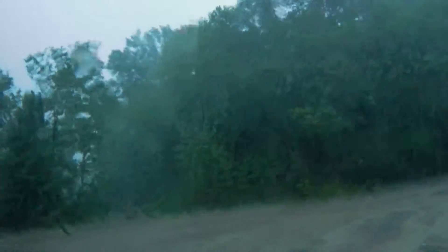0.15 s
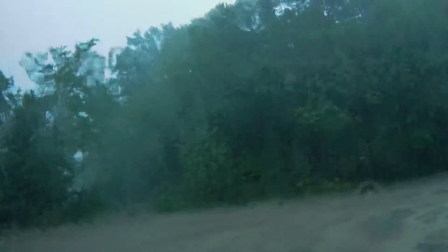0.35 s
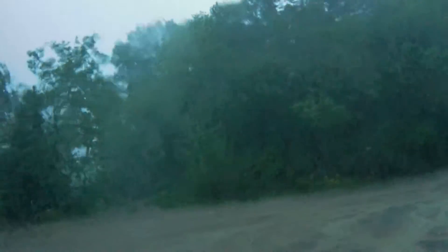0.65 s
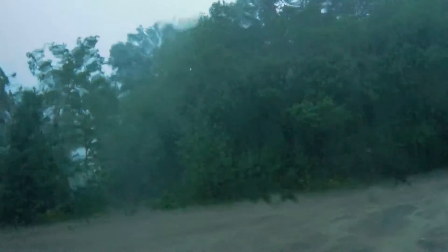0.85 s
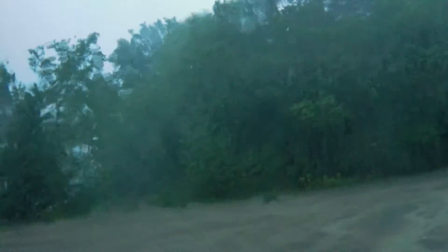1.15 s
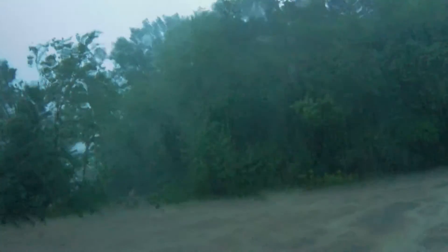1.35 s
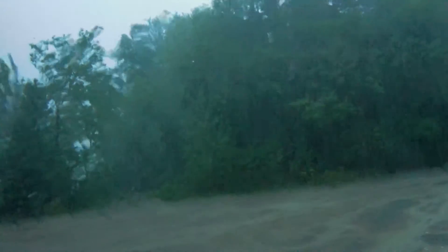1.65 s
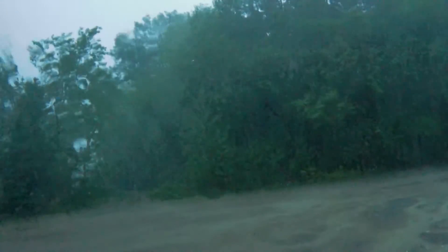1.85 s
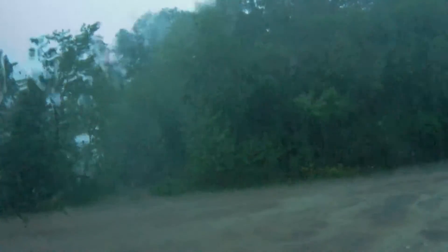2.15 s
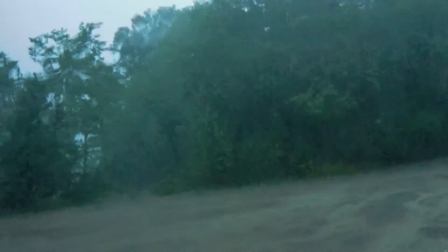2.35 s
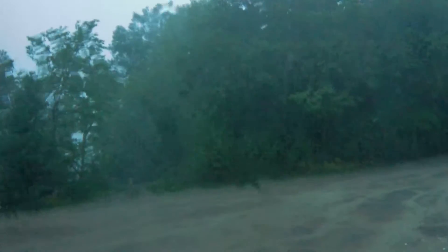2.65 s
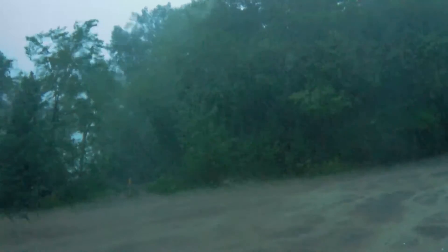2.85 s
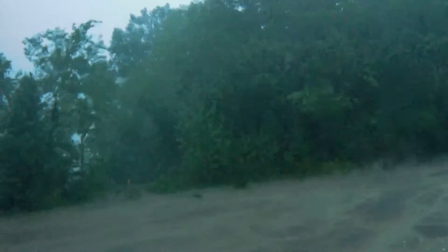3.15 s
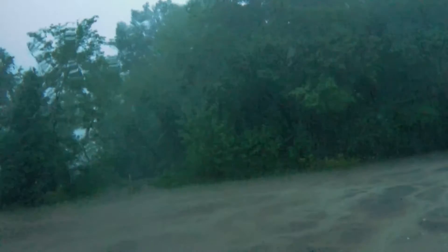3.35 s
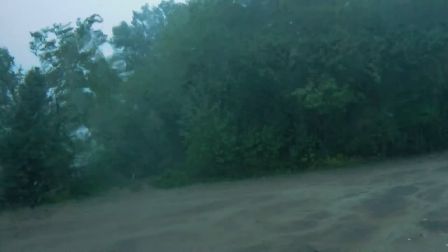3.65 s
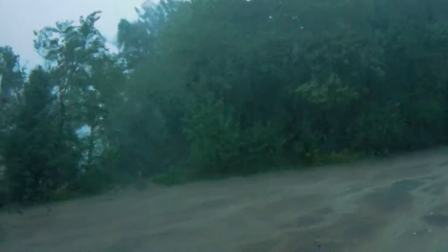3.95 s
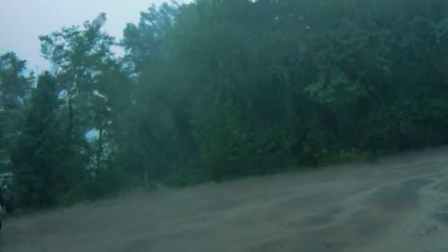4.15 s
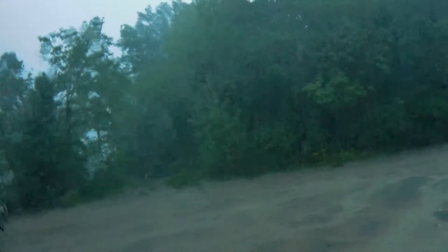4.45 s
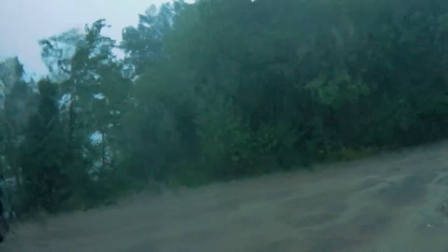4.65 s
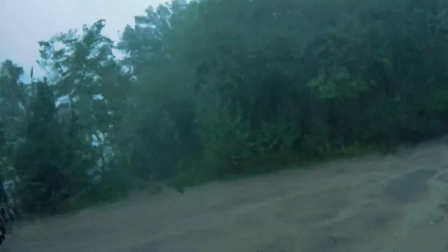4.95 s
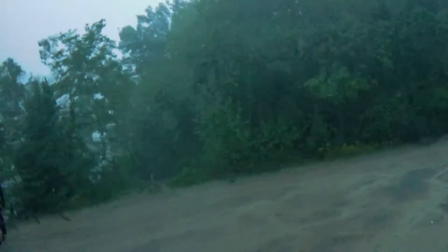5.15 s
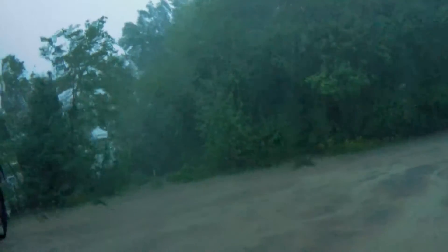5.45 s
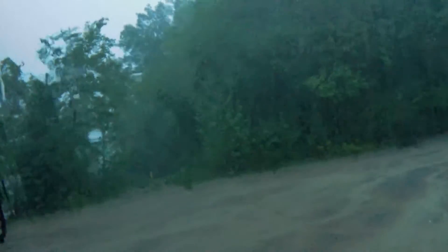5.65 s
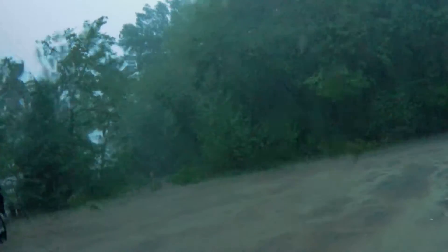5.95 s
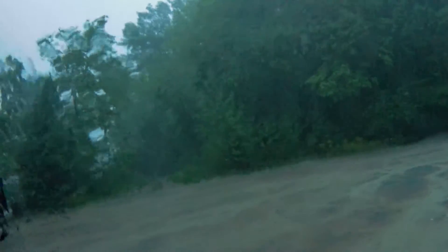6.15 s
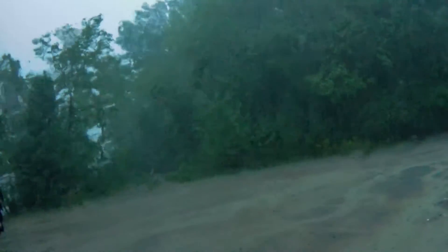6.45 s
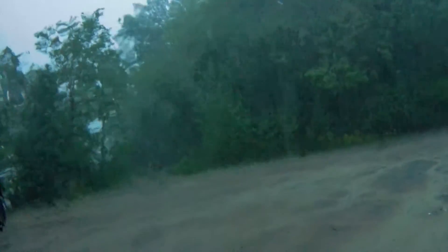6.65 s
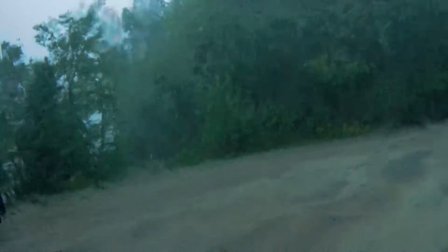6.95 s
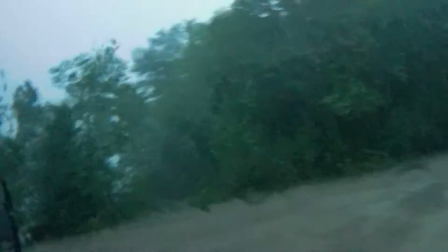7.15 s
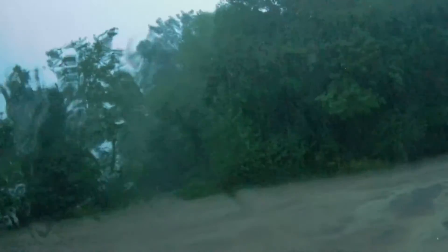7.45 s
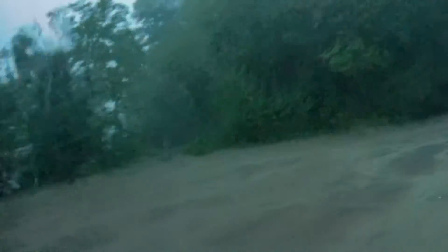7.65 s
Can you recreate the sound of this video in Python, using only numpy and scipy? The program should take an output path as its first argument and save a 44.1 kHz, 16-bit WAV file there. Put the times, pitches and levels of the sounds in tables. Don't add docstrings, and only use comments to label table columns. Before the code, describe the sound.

Inside a truck cab, a dense rushing downpour pounds sheet metal, thins midway and swells again, over a faint deep idle and scattered window ticks.

```python
import sys
import numpy as np
from scipy import signal
from scipy.fft import rfft, irfft, next_fast_len
from scipy.io import wavfile
from scipy.ndimage import uniform_filter1d

SR = 44100
rng = np.random.default_rng(int(sys.argv[2]) if len(sys.argv) > 2 else 0)


def gain_from_db(level_db):
    decades = np.asarray(level_db, float) / 20
    return 10 ** decades


def put_to_file(sound):
    columns = np.atleast_2d(sound).T
    safe = np.clip(columns, -1, 1)
    whole_steps = np.round(safe * 32767)
    wavfile.write(sys.argv[1], SR, whole_steps.astype(np.int16))


N = 343980


def unit_rms(x):
    return x / np.sqrt(np.mean(x ** 2) + 1e-20)


def curve(points):
    time_s, value = np.transpose(points)
    return np.interp(np.arange(N) / SR, time_s, value)


def bells(center_s, heights, half_s):
    t = np.arange(N)[:, None] / SR
    return np.exp(-((t - center_s) / half_s) ** 2) @ heights


def at_hz(points, hz):
    table_hz, value = np.transpose(points)
    return np.interp(np.log(hz + 1), np.log(table_hz), value)


def coloured(spectrum, points):
    hz = np.arange(len(spectrum)) * SR / (2 * len(spectrum) - 2)
    return unit_rms(irfft(spectrum * gain_from_db(at_hz(points, hz)))[:N])


def drift(rate_hz):
    hop = 40
    r = np.exp(-2 * np.pi * rate_hz * hop / SR)
    noise = rng.standard_normal(N // hop + 2002)
    slow = signal.lfilter([1], [1, -2 * r, r * r], noise)[2000:]
    return np.interp(np.arange(N) / hop, np.arange(len(slow)), unit_rms(slow))


# freq_hz, density_db_per_hz
ROOF_COLOUR = [(53, -38), (90, -4.5), (150, 0), (270, -5), (420, -2), (700, -3.5), (1150, -8), (1600, -6.5),
               (1780, -11.5), (1950, -15.5), (2300, -21.5), (2800, -35.5), (3200, -44), (4200, -49.5)]
# freq_hz, density_db_per_hz
GLASS_COLOUR = [(1700, -13.5), (2600, -2.5), (3150, -8), (3700, 0), (4400, -4.5), (5700, -4.5), (7000, -12),
                (8600, -21.5), (9700, -20), (10800, -14), (12000, -23), (14000, -37), (15600, -36)]
# center_hz, width_hz, boost_db
PANEL_MODES = [(218, 56, 5), (339.6, 56, 6), (422, 103, 6), (617.4, 57, 6), (880, 136, 4.5),
               (1302, 1080, 7.5)]


def rain():
    drops_per_s, size_spread_db = 2500.0, 1
    roof_db, glass_db, boom_db = storm()
    clumps_db = 0.5 * drift(21.0) + 0.46 * drift(44.0)

    gust = gain_from_db(roof_db - roof_db.mean()) ** 0.6
    landed = rng.random(N) < drops_per_s * gust / SR
    size_db = size_spread_db * np.minimum(rng.exponential(1, N), 6)
    drops = landed * gain_from_db(size_db) * rng.choice([-1, 1], N)
    local_power = uniform_filter1d(drops ** 2, size=SR // 10)
    drops = drops / np.sqrt(local_power + 1e-9) * gain_from_db(clumps_db)

    spots = spot_responses(count=8)
    fft_size = 2 * next_fast_len(N // 2 + SR // 4)
    spot_of = rng.integers(0, len(spots), N)
    answers = rfft(spots, fft_size)
    answers = answers / np.sqrt(np.mean(abs(answers) ** 2, axis=0) + 1e-12)
    struck = sum(rfft(drops * (spot_of == k), fft_size) * h for k, h in enumerate(answers))

    hz = np.arange(len(struck)) * SR / fft_size
    boost_db = sum(db / (1 + ((hz - center_hz) / (width_hz / 2)) ** 2)
                   for center_hz, width_hz, db in PANEL_MODES)
    roof = gain_from_db(roof_db + 0.66) * coloured(struck * gain_from_db(boost_db), ROOF_COLOUR)
    boom = signal.sosfilt(signal.butter(1, 700.0, fs=SR, output="sos"), roof)
    roof = roof + (gain_from_db(boom_db) - 1) * boom

    glass = gain_from_db(glass_db + 0.54) * coloured(struck, GLASS_COLOUR)
    mist = signal.sosfilt(signal.butter(2, 6500.0, "high", fs=SR, output="sos"), glass)
    mist_db = 0.2 * (glass_db - glass_db.mean()) + 1.0 * drift(11.0)
    return roof + glass + (gain_from_db(mist_db) - 1) * mist


# time_s, level_db
DOWNPOUR_LEVEL = [(0, -37), (.26, -38), (.38, -33.5), (.76, -36), (.84, -38.5), (1.3, -41), (1.5, -39),
                  (2.26, -40), (2.34, -44), (3.0, -44), (3.42, -49), (4.08, -49), (4.45, -40),
                  (4.98, -46.5), (5.16, -42.5), (6.2, -43), (7.3, -38), (7.8, -37.5)]
# center_s, change_db, half_s
SHEETS_AND_LULLS = [(0.174, -5, .05), (1.84, -2.5, .09), (2.89, 3.5, 0.088), (3.54, -5, 0.033),
                    (3.808, 3, 0.019), (3.99, -1.5, 0.018), (4.254, 2, .07), (5.351, 1.5, .05),
                    (6.406, 3, .05), (6.5, -0.5, 0.024), (6.603, 3, 0.093), (7.8, -4, .02)]
# time_s, level_db
WIND_SLANT = [(0, -19.5), (.27, -17.5), (.5, -19.5), (1.6, -21.5), (2.6, -23), (3.6, -24), (4.1, -20.5),
              (4.5, -25.5), (5.0, -21), (5.3, -22), (6.3, -19), (6.8, -21), (7.55, -21), (7.8, -22.5)]


def storm():
    roof_db = curve(DOWNPOUR_LEVEL) + bells(*np.transpose(SHEETS_AND_LULLS))
    slant_db = curve(WIND_SLANT)
    boom_db = -0.07 - 0.1 * (roof_db - roof_db.mean()) - 0.23 * (slant_db - slant_db.mean())
    return roof_db, roof_db + slant_db, boom_db


# freq_hz, t60_s
BODY_DECAY = [(100, 0.19), (500, 0.085), (1500, 0.071), (4000, 0.015), (12000, 0.0052)]


def spot_responses(count):
    t = np.arange(SR // 4) / SR
    white = rng.standard_normal((2, count, len(t)))
    out = 0
    for k, low_hz in enumerate(40 * 2.0 ** np.arange(9)):
        t60_s = at_hz(BODY_DECAY, low_hz * np.sqrt(2))
        high_hz = min(2 * low_hz, 0.49 * SR)
        band = signal.butter(2, [low_hz, high_hz], "band", fs=SR, output="sos")
        decay = gain_from_db(-60 * t / t60_s) / np.sqrt(t60_s)
        out = out + signal.sosfilt(band, white[k % 2] * decay)
    return out


# start_s, thud_db, splash_db, splash_hz
BIG_DROPS = [(0.0298, -36, -53, 8500), (0.2164, -40, -69, 10800), (0.2568, -30, -51, 11000),
             (0.5661, -36, -66, 8100), (0.6479, -35, -61, 10100), (0.7966, -37, -60, 10700),
             (0.8474, -49, -64.5, 10100), (0.9524, -41, -64, 7500), (0.9654, -44, -58, 10900),
             (1.0735, -31, -54, 10600), (1.1144, -46, -68, 10600), (1.3733, -43, -74, 9800),
             (1.8562, -44, -68, 10900), (2.8225, -47, -61, 9500), (2.8624, -57, -62, 12000),
             (3.2256, -50, -71, 10800), (3.4371, -51, -72, 8400), (3.7988, -51, -76, 7500),
             (4.2203, -42, -71, 10700), (4.3784, -50, -60, 10300), (4.6074, -50, -65, 10900),
             (4.8559, -45, -59, 8000), (4.9404, -52, -61, 11200), (5.0634, -48, -65, 11000),
             (5.4864, -44, -70, 7700), (6.8758, -42, -71, 11100), (6.9361, -40, -64, 10700),
             (7.0025, -42, -56, 11400), (7.1894, -50, -61, 10700), (7.2894, -53, -64, 10800)]
# freq_hz, level_db, t60_s
TICK_MODES = [(1470, 5, 0.017), (2300, 2, .012), (3710, -0.5, 0.018), (4660, -2, 0.012), (5420, 0.5, 0.017),
              (6550, -3.5, 0.012)]


def ticks():
    splash_t60_s, delay_s = 0.015, 0.00053
    t = np.arange(1000) / SR
    out = np.zeros(N + len(t))
    for start_s, thud_db, splash_db, splash_hz in BIG_DROPS:
        thud = 0
        for k, (hz, db, t60_s) in enumerate(TICK_MODES):
            ring_db = db + rng.normal(0, 1.5) - 60 * t / t60_s
            thud = thud + (-1) ** k * gain_from_db(ring_db) * np.sin(2 * np.pi * hz * t)
        burst = rng.standard_normal(len(t)) * gain_from_db(-60 * t / splash_t60_s)
        band = signal.butter(2, [0.81 * splash_hz, 1.12 * splash_hz], "band", fs=SR, output="sos")
        splash = signal.sosfilt(band, burst)
        at = round((start_s + delay_s) * SR)
        out[at:at + len(t)] += gain_from_db(thud_db - 12) * thud + gain_from_db(splash_db + 10.5) * splash
    return out[:N]


# firing_rate_multiple, level_db
FIRING_ORDERS = [(1, -2.5), (2, -20.5), (3, -26.5), (4, -34.5), (5, -32.5)]
# freq_hz, density_db_per_hz
FRAME_RUMBLE = [(12, -19), (25, 4), (45, 4), (60, 14.5), (110, 4), (200, 7.5), (400, -28.5)]
# center_s, sag_hz
IDLE_STUMBLES = [
    (.5, 0.81),
    (1.02, 0.24),
]


def engine():
    idle_hz, idle_db, rumble_db = 34.98, -37.5, -55
    stumble_half_s, shake_db_per_hz = 0.092, 4.0
    sag_hz = bells(*np.transpose(IDLE_STUMBLES), stumble_half_s)
    firing_hz = idle_hz - sag_hz + 0.091 * drift(2.6)
    level_db = idle_db + shake_db_per_hz * sag_hz + 0.5 * drift(0.5) + 0.27 * drift(7.6)
    phase = 2 * np.pi * np.cumsum(firing_hz) / SR
    starts = rng.uniform(0, 2 * np.pi, len(FIRING_ORDERS))
    tones = sum(gain_from_db(db) * np.sin(order * phase + start)
                for (order, db), start in zip(FIRING_ORDERS, starts))
    rumble = gain_from_db(rumble_db) * coloured(rfft(rng.standard_normal(N)), FRAME_RUMBLE)
    return np.sqrt(2) * gain_from_db(level_db) * tones + rumble


def scene():
    return (rain() + ticks() + engine())[None, :]


# freq_hz, density_db_per_hz
MIC_HISS = [(1500, 15), (5000, 14), (9000, -21), (12000, -20), (14500, -6), (15300, -7), (15700, -16)]


def mic_hiss():
    return gain_from_db(-75) * coloured(rfft(rng.standard_normal(N)), [(300, -30)] + MIC_HISS)


# freq_hz, share_of_time
TREBLE_GAPS = [(7000, 0), (8000, .01), (11000, .05), (12200, .27), (14800, .25), (15600, .45)]


def treble_gaps(x):
    hz, s, cells = signal.stft(x, SR, nperseg=1024)
    chance = rng.random((len(hz) // 4 + 1, len(s) // 3 + 1))
    chance = chance.repeat(4, axis=0).repeat(3, axis=1)
    empty = chance[:len(hz), :len(s)] < at_hz(TREBLE_GAPS, hz)[:, None]
    return signal.istft(cells * ~empty, SR, nperseg=1024)[1][..., :N]


def low_pass(x):
    return signal.sosfilt(signal.butter(12, 15640, fs=SR, output="sos"), x)


def record(dry):
    roll_off = signal.butter(8, 15300.0, fs=SR, output="sos")
    rolled = signal.sosfilt(roll_off, dry + mic_hiss())
    return low_pass(treble_gaps(rolled))


dry = scene()
out = record(dry)
put_to_file(out)
```